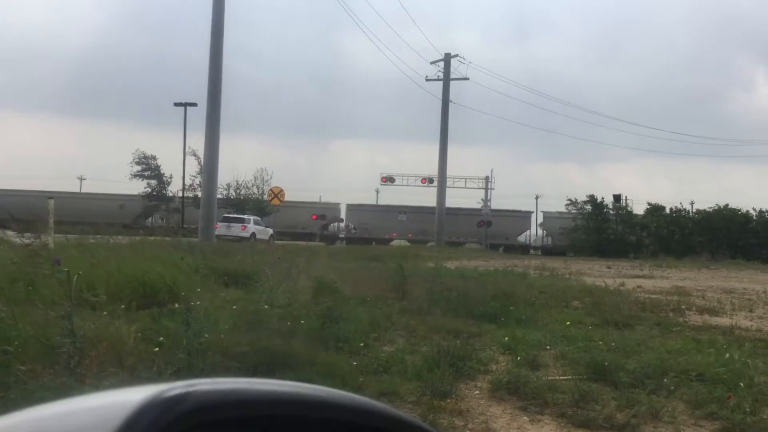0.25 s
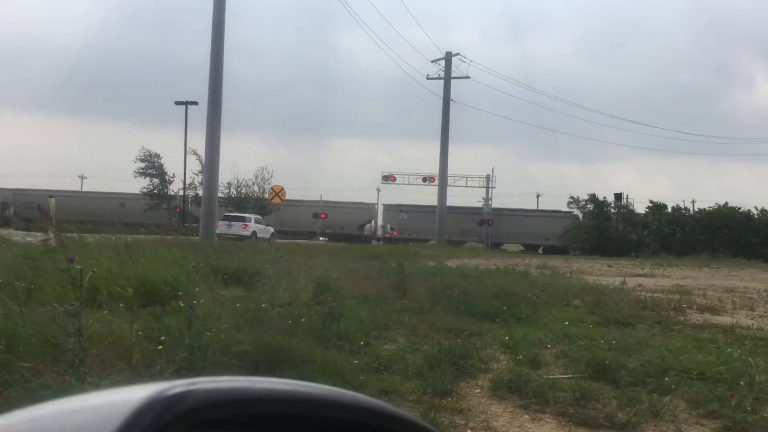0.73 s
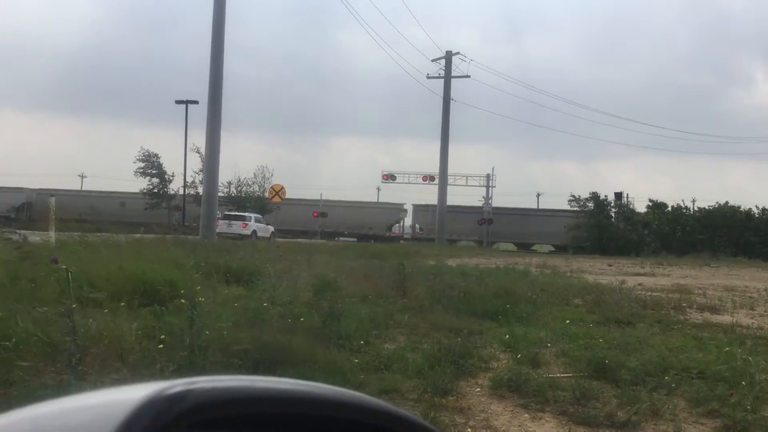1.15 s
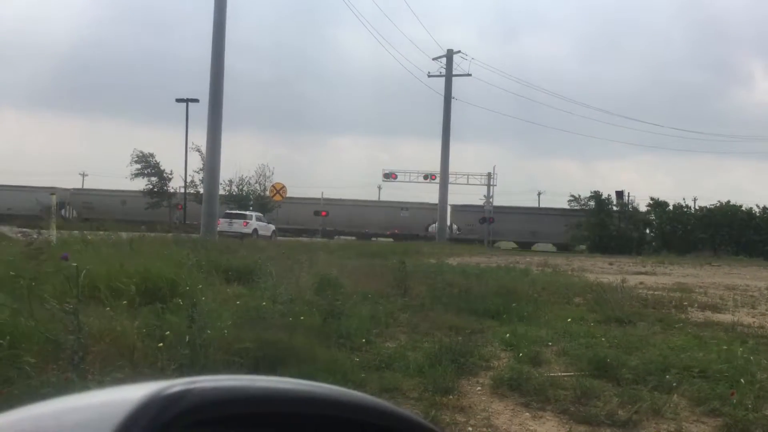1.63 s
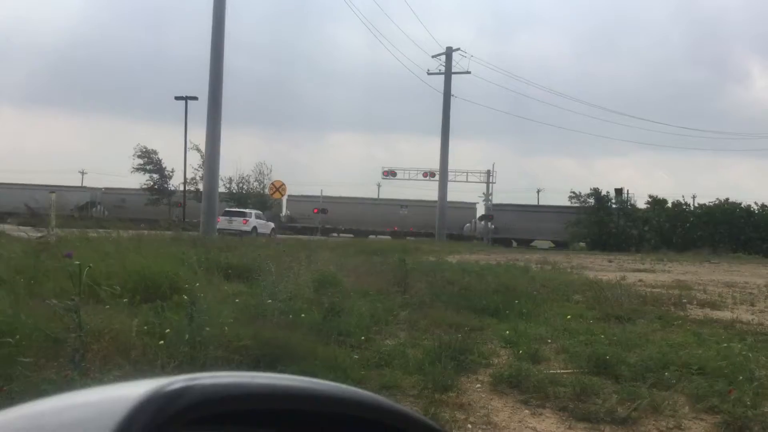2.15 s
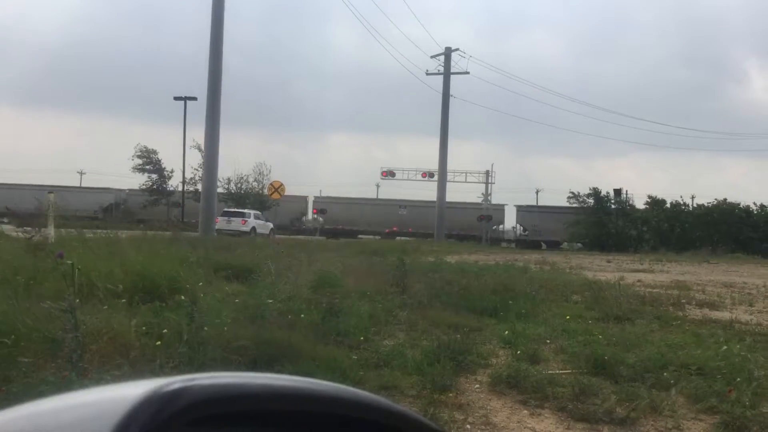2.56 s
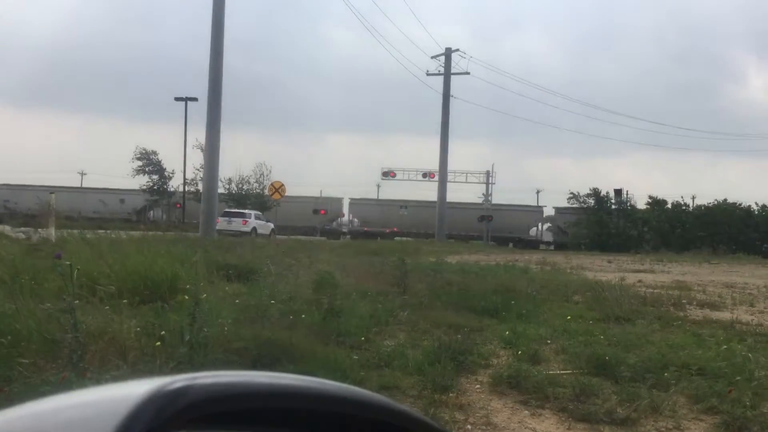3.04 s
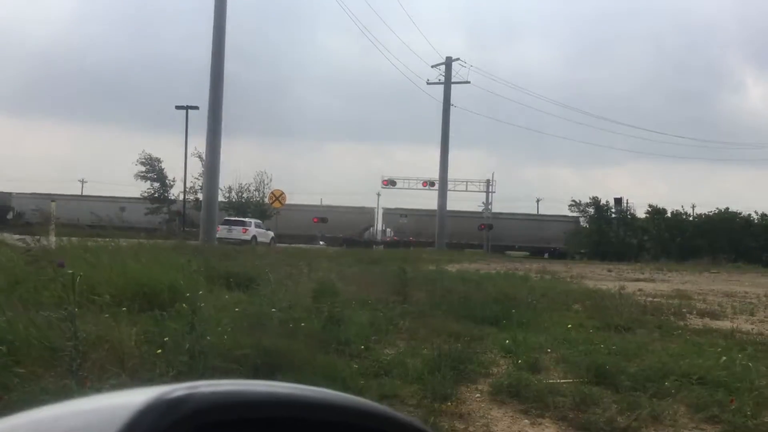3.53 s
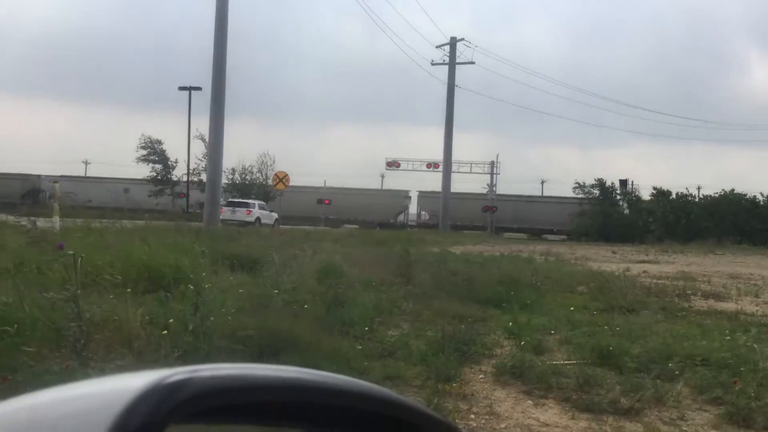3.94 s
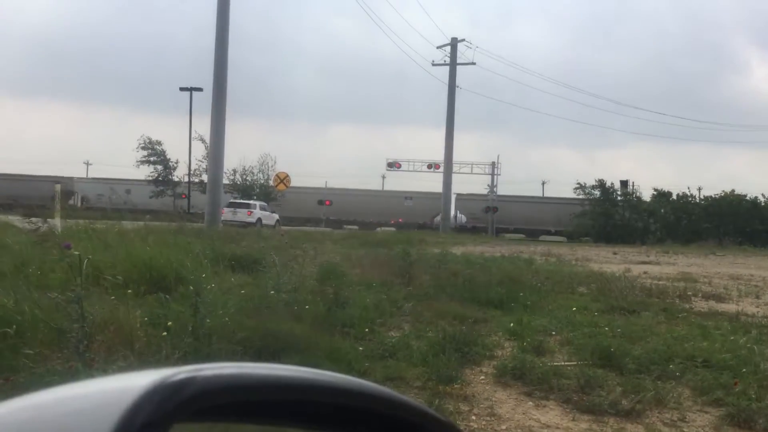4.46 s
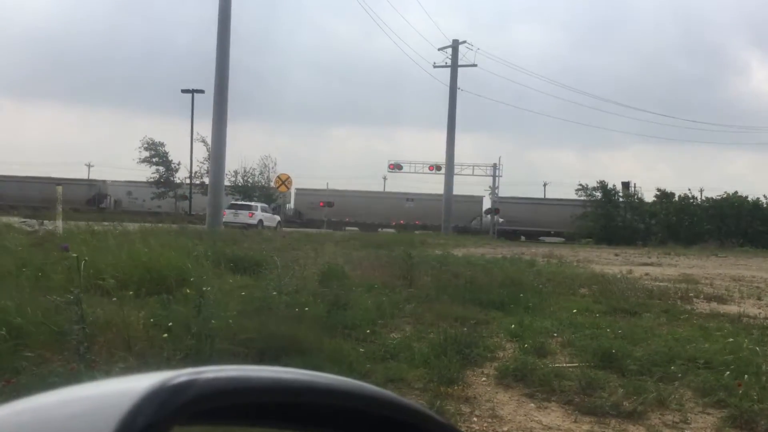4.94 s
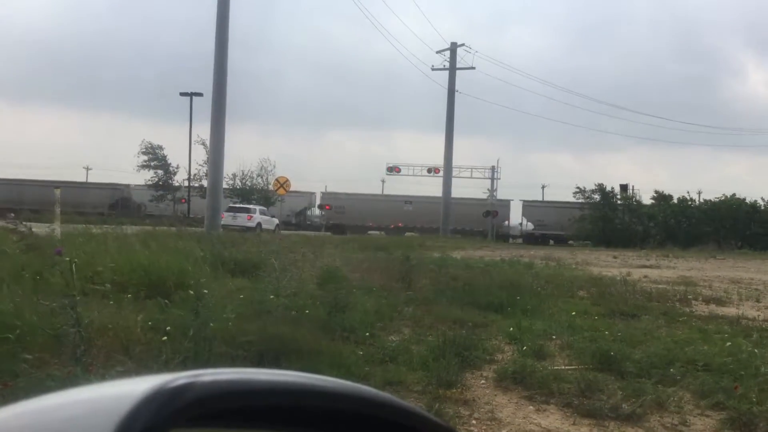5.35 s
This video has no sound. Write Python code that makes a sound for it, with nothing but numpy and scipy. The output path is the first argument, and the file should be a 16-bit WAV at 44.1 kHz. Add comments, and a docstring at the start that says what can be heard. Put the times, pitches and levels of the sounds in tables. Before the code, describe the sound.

Outdoors near a railway crossing, a phone microphone is hit by gusty wind: dense low thumps, flutter and crackly snaps for the first two seconds. The wind then eases to a low, uneven rumble, uncovering a freight train's rolling roar, paired wheel knocks and thin metallic squeals. Near the end the gusts return, with one very hard thump just before the cut.

```python
"""Gusty wind buffets and thumps a phone's microphone, while a freight train rolls past behind it.
The wind is shaped noise in four sizes of eddy, with single swings of the membrane for the strongest.
The train is patchy rolling noise that swells as wheels knock over rail joints; rubbing flanges hiss and
set wheel resonances squealing. One microphone port, with a drifting null, colours the train at first;
for a while the phone listens through its other port, which has a peak instead."""
import sys
import numpy as np
from scipy import signal
from scipy.fft import rfft, irfft, next_fast_len
from scipy.io import wavfile
from scipy.ndimage import uniform_filter1d, map_coordinates

SR = 44100
rng = np.random.default_rng(int(sys.argv[2]) if len(sys.argv) > 2 else 0)


def generate_wav(sig):
    """Save sig (samples, or channels by samples) to the path in sys.argv[1] as 16-bit PCM at SR."""
    pcm = np.round(np.clip(np.atleast_2d(sig).T, -1, 1) * 32767).astype(np.int16)
    wavfile.write(sys.argv[1], SR, pcm)


N = 246519

# strength of the wind at the microphone: [t/s, eddy level/dB, small-eddy level/dB]
WIND = [(0, -46.5, -65), (.1, -32.5, -38), (.3, -36, -36.5), (.5, -35, -36.5), (.75, -31, -32.5),
        (.95, -35, -42), (1.0, -41, -36.5), (1.2, -32, -32), (1.35, -29.5, -41), (1.55, -31.5, -44.5),
        (1.7, -30, -41), (2.05, -30, -51.5), (2.3, -37, -56), (2.6, -40.5, -56.5), (3.2, -41, -55),
        (3.5, -42, -55), (3.8, -38, -54.5), (4.15, -43, -57), (4.45, -42, -52.5), (4.78, -45, -54.5),
        (4.83, -48.5, -53), (4.88, -35.5, -48), (5.04, -42, -47.5), (5.25, -36, -39.5), (5.4, -35.5, -38.5),
        (5.59, -33.5, -38.5)]
# the strongest single eddies: [crest t/s, swing level/dB, pitch f/Hz, snap level re the swing/dB]
THUMPS = [(0.029, -18.5, 304, 0), (0.066, -20, 200, -10), (0.082, -11, 297, -15), (0.101, -14, 169, -20),
          (0.116, -18, 160, -20), (0.182, -15.5, 362, 4), (0.211, -20, 180, -15), (0.226, -16.5, 278, 5),
          (0.251, -13, 260, 3.5), (0.306, -12, 200, -29), (0.328, -22, 180, -24), (0.366, -16.5, 227, -28),
          (0.386, -17.5, 235, -10), (.42, -17.5, 297, -5), (.434, -6.5, 190, -3), (.508, -17, 460, -10),
          (.525, -12, 426, -27), (0.541, -6.5, 220, -27), (.604, -16, 353, 5), (0.649, -5, 250, -4),
          (0.673, -12, 257, 1.5), (0.728, -17, 315, 8), (.748, -15, 435, -10), (0.767, -16, 242, 1),
          (0.803, -16, 223, 7), (0.834, -29, 220, -15), (.885, -15, 408, 4.5), (.905, -7.5, 296, -0.5),
          (0.929, -13.5, 260, -6), (0.945, -24, 200, -18), (0.977, -5.5, 262, -20), (0.993, -8.5, 248, -2),
          (1.007, -13.5, 282, 3), (1.025, -15, 260, 3), (1.049, -12, 330, -5), (1.071, -20, 350, 0),
          (1.095, -8.5, 350, 0), (1.125, -14.5, 253, -2), (1.143, -14.5, 310, -9), (1.155, -15, 200, -16),
          (1.173, -9.5, 270, -21), (1.197, -16, 383, 3.5), (1.214, -11, 364, 1.5), (1.221, -18, 170, -10),
          (1.238, -13, 220, 3), (1.258, -8, 305, -5), (1.284, -21, 170, -20), (1.297, -9, 288, -16),
          (1.305, -9.5, 427, 1.5), (1.371, -18, 220, -24), (1.386, -8.5, 235, -1), (1.433, -8.5, 192, 0.5),
          (1.457, -15, 239, -3), (1.476, -26, 260, -6), (1.52, -6.5, 284, -3), (1.543, -21, 200, -15),
          (1.605, -16.5, 260, -12), (1.652, -12, 288, 2), (1.672, -15.5, 220, -16), (1.698, -10.5, 210, 0),
          (1.728, -8, 180, -11), (1.75, -8, 280, -5.5), (1.786, -13.5, 285, 3.5), (1.813, -11.5, 286, 2),
          (1.83, -8.5, 260, -8), (1.878, -16, 189, -25), (1.894, -15.5, 300, -9), (1.926, -10.5, 202, -4),
          (1.942, -17, 298, -6), (1.981, -14, 201, -30), (2.001, -21.5, 262, -9), (2.025, -13.5, 197, -5),
          (2.154, -29, 200, -15), (2.18, -17.5, 273, -14), (2.228, -26, 202, -12), (2.306, -22, 200, -10),
          (2.355, -21, 205, -3), (2.421, -19, 219, -35), (2.514, -27, 188, -18), (2.611, -21.5, 202, -18),
          (2.687, -26, 160, -25), (2.785, -17, 199, -10), (3.111, -22, 162, -23), (3.167, -25, 169, -18),
          (3.198, -28, 169, -23), (3.46, -26, 163, -28), (3.555, -20, 181, -29), (3.647, -25, 190, -1),
          (4.217, -21.5, 218, -16), (4.279, -21, 274, -11), (4.299, -27, 200, -20), (4.342, -16.5, 248, -9),
          (4.52, -23, 267, -19), (4.541, -16, 243, -12), (4.649, -26, 180, -15), (4.676, -21.5, 298, -5),
          (4.698, -38, 200, -18), (4.713, -36, 280, -17), (4.847, -15, 238, -18), (4.877, -16, 190, -13),
          (4.904, -23, 180, -13), (4.969, -26.5, 258, -20), (5.069, -22.5, 275, -32), (5.09, -16, 242, -12),
          (5.111, -11.5, 360, -0.5), (5.137, -14.5, 193, -2), (5.176, -16, 200, -10),
          (5.203, -8.5, 245, -0.5), (5.235, -19, 258, 7.5), (5.252, -12.5, 184, 1.5),
          (5.269, -18.5, 362, 6), (5.292, -21.5, 370, -15), (5.363, -19, 268, -2), (5.398, -21, 221, -15),
          (5.41, -26, 200, -22), (5.425, -18, 192, -21), (5.45, -19, 200, -11), (5.475, -12, 238, 1),
          (5.493, -1, 311, -6), (5.585, -10.5, 263, -15)]
# centre frequencies of the wheel resonances: [f/Hz]
WHEEL_HZ = (2488, 3815, 4620, 5323, 6080, 7835, 9100, 9534, 9860, 10950, 11550, 12950, 14300)


def amp(db):
    """Level to amplitude: 20 dB is a factor of ten."""
    return 10 ** (np.asarray(db) / 20)


def unit(x):
    """Normalisation to a root-mean-square amplitude of 1."""
    return x / np.sqrt(np.mean(x ** 2) + 1e-20)


def colour(points):
    """Spectral envelope: gain interpolated through (Hz, dB) points on a logarithmic frequency axis."""
    f, db = np.transpose(points)
    return lambda hz: amp(np.interp(np.log(hz + 1), np.log(f + 1), db))


def curves(rows):
    """Linear interpolation in time: one value per sample for each column after the time."""
    s, *cols = np.transpose(rows)
    return [np.interp(np.arange(N) / SR, s, c) for c in cols]


def wobble(rate):
    """Slow random modulation: a smooth curve through normal random knots, rate of them a second."""
    knots = rng.standard_normal(int(N * rate / SR) + 4)
    return map_coordinates(knots, [np.arange(N) * rate / SR])


def filtered(x, response):
    """Linear filtering: the spectrum of x times a response of frequency."""
    m = next_fast_len(N + 8192)
    return irfft(rfft(x, m) * response(np.fft.rfftfreq(m, 1 / SR)), m)[..., :N]


def bells(rows, width_s, rise=1):
    """Superposition of sech swells, one per (crest s, height), down to a third width_s after the crest."""
    t = np.arange(0, N + 64, 64) / SR
    s, height = np.transpose(rows)
    late = (t - s[:, None]) / np.reshape(width_s, (-1, 1))
    late = np.where(late < 0, late / rise, late)  # rise: time scale before the crest over that after it
    swells = height[:, None] / np.cosh(np.clip(1.76 * late, -50, 50))
    return np.interp(np.arange(N) / SR, t, swells.sum(axis=0))


def evened(x, share):
    """Envelope compression: narrow noise with a share of its own chance beating taken out."""
    envelope = np.abs(signal.hilbert(x, next_fast_len(N))[:N])
    return x / (envelope + 0.1 * x.std()) ** share


def stirring(s, db, rule):
    """Wake turbulence: each thump stirs the air around it, the more the stronger it is."""
    level_db, grows, width_s = rule
    swells = np.transpose([s, amp(level_db + grows * (db + 7.0))])
    return bells(swells, width_s, rise=0.73)  # builds faster than it settles


def buffeting():
    """Intermittent turbulence: lumps shared by all but the flurries, sharper for smaller eddies."""
    # spectral envelope of each size of eddy: [f/Hz, relative level/dB]
    slow_colour, eddy_colour, small_colour = [(15, -64.5), (28, -35), (45, -5), (80, 1.5), (120, -4),
                                              (170, -18), (260, -55.5), (400, -120)], [(40, -120), (70, -37.5), (120, 3), (200, 1),
                                                            (320, -7.5), (450, -20), (650, -49.5),
                                                            (1000, -120)], [(150, -120), (260, -12), (420, 0),
                                                                          (600, -1.5), (800, -10.5),
                                                                          (1100, -25), (1500, -31.5),
                                                                          (2200, -60), (3000, -120)]
    # flurries of small eddies: [crest t/s, level/dB, time scale/s]
    flurry_rows = [(0.036, -32, 0.0089), (.085, -29, .015), (.18, -27.5, 0.019), (.255, -27, 0.0067),
                   (.21, -34, 0.007), (.291, -27, 0.0083), (.38, -33, 0.013), (.427, -26, 0.0066),
                   (.47, -30.5, 0.016), (0.509, -28, 0.0088), (.566, -37.5, .005), (.605, -31, 0.0058),
                   (0.643, -24, 0.0033), (0.706, -27.5, .007), (0.752, -26, 0.0051), (.826, -32, 0.0063),
                   (0.861, -34.5, .01), (.92, -26, .015), (1.072, -30, .005), (1.145, -32, 0.0069),
                   (1.197, -30, .005), (1.344, -35, 0.0051), (1.59, -37, 0.0051), (1.672, -26, 0.0051),
                   (1.774, -28, 0.0051), (1.833, -25, 0.0043), (1.939, -27.5, 0.0057), (2.001, -36, 0.0047),
                   (2.065, -35, 0.024), (2.206, -36.5, 0.0068), (2.354, -37.5, .007), (3.046, -42, 0.0068),
                   (3.617, -46, .006), (3.83, -44, .006), (3.925, -46, 0.0072), (4.25, -45.5, 0.015),
                   (4.335, -39, 0.0066), (4.665, -39, 0.023), (4.885, -34, .012), (5.449, -38, 0.007)]
    # turbulence stirred by a thump: [level at a -7 dB drive/dB, growth/(dB per dB), time scale/s]
    eddy_stir, small_stir = (-31, 0.69, 0.022), (-30, 1, 0.012)

    eddy_db, small_db = curves(WIND)
    s, db, _, snap_db = np.transpose(THUMPS)
    slow_level = amp(-34.5 + 0.39 * (eddy_db - eddy_db.mean()))  # sways less than the wind
    eddy_level = amp(eddy_db) + stirring(s, db, eddy_stir)
    small_level = amp(small_db) + stirring(s, db + 0.76 * snap_db, small_stir)  # follows the snap
    flurry_level = bells([(at, amp(top)) for at, top, _ in flurry_rows], [w for *_, w in flurry_rows])

    # bounded modulation: the strongest eddies are the thumps
    lumps, flicks = np.tanh(wobble(40)), np.tanh(wobble(120))
    slow = filtered(amp(0.52 * lumps) * rng.standard_normal(N), colour(slow_colour))
    eddy = filtered(amp(5.3 * lumps + 1.3 * flicks) * rng.standard_normal(N), colour(eddy_colour))
    small = filtered(amp(2.5 * lumps + 6.9 * flicks) * rng.standard_normal(N), colour(small_colour))
    duller = lambda f: colour(small_colour)(1.13 * f)  # the same envelope shifted down
    flurry = filtered(amp(3.6 * flicks) * rng.standard_normal(N), duller)

    return (slow_level * unit(evened(slow, share=0.29))
            + eddy_level * unit(evened(eddy, share=0.25))
            + flurry_level * unit(evened(flurry, share=0.4))
            + small_level * unit(evened(small, share=0.11)))


def minor_thumps():
    """Random occurrence: rows like THUMPS at chance moments, stronger and higher in stronger wind."""
    count = 45
    s, scatter = rng.random(count) * N / SR, rng.standard_normal((count, 3))
    wind_db = np.interp(s, *np.transpose(WIND)[:2])
    db = wind_db + 13.5 + 2 * scatter[:, 0]
    hz = (185 + 17.5 * (wind_db - wind_db.mean())) * np.exp(0.14 * scatter[:, 1])
    snap_db = -9.5 + 5 * scatter[:, 2]
    return list(zip(s, db, hz, snap_db))


def thumps(turns=0.28, settles=1.71, sag=0.32, snap_hz=720, snap_s=0.00049, crisper_db=1.18):
    """Transient response: an eddy snaps the membrane, which swings out more slowly at a sinking pitch."""
    out, t = np.zeros(N + SR), np.arange(-SR // 20, SR // 20) / SR
    rows = list(THUMPS) + minor_thumps()
    chance = rng.standard_normal((len(rows), 2))
    phase = np.pi / 2 * np.sign(chance[:, 0]) + 0.43 * chance[:, 1]  # mostly one way and straight back
    for (s, db, hz, snap_db), start in zip(rows, phase):
        cycles = t * hz
        swell = np.exp(-(cycles / turns / np.where(t > 0, settles, 1)) ** 2 / 2)
        swing = swell * np.cos(2 * np.pi * (cycles - sag * cycles * np.tanh(cycles)) + start)
        # hard snaps are shorter and higher: crisp is 1 for a snap at -10 dB
        crisp = amp(crisper_db * np.clip(db + snap_db + 10, -10, 10))
        snap_swell = np.exp(-np.sqrt(2.65 + (t * crisp / snap_s) ** 2))
        snap = snap_swell * np.cos(2 * np.pi * snap_hz * crisp * t + start)
        out[round(s * SR):][:len(t)] += amp(db) * (swing + amp(snap_db) * snap)
    return out[SR // 20:][:N]


def surges(sigma_s=0.0075):
    """Slow forcing: each swell of the slowest eddies rocks the membrane under a Gaussian envelope."""
    # swells of the slowest eddies: [crest t/s, level/dB, pitch f/Hz]
    surge_rows = [(0.061, -25, 104), (0.095, -22, 94), (0.165, -28, 89), (0.23, -20, 96), (0.261, -26, 98),
                  (0.31, -25, 102), (0.332, -26, 100), (0.441, -28, 85), (0.47, -25, 75), (0.578, -23, 83),
                  (0.659, -15, 70), (0.68, -12, 67), (0.735, -19, 85), (0.781, -18.5, 82), (0.807, -28, 93),
                  (0.901, -32, 89), (0.988, -19, 106), (1.02, -21, 87), (1.139, -23, 86),
                  (1.224, -14.5, 103), (1.287, -22, 100), (1.311, -18, 87), (1.391, -20, 87),
                  (1.441, -13, 97), (1.501, -24, 83), (1.612, -22, 90), (1.676, -20, 97), (1.724, -20, 104),
                  (1.766, -21, 86), (1.832, -16.5, 87), (1.928, -23, 87), (1.983, -16.5, 91),
                  (2.03, -21, 90), (2.133, -26, 106), (2.168, -30, 104), (2.202, -28, 86), (2.255, -28, 94),
                  (2.323, -26, 98), (2.375, -24, 84), (2.573, -26, 90), (2.684, -26, 99), (2.706, -31, 97),
                  (2.74, -25.5, 87), (2.834, -18.5, 84), (2.869, -23, 73.5), (2.95, -24.5, 88),
                  (3.009, -20.5, 87), (3.073, -25.5, 77), (3.159, -33, 85), (3.19, -31, 74),
                  (3.223, -31, 83), (3.266, -23, 87), (3.401, -32, 81), (3.453, -20.5, 95),
                  (3.485, -21.5, 92), (3.572, -21.5, 87), (3.6, -29, 82), (3.648, -26, 87),
                  (3.742, -25, 86), (3.861, -19, 78), (4.02, -20.5, 84), (4.074, -21, 90),
                  (4.125, -23.5, 84), (4.197, -21, 89), (4.293, -27, 95.5), (4.406, -19, 90),
                  (4.447, -19.5, 82.4), (4.56, -19, 81), (4.619, -24, 84), (4.653, -28, 83),
                  (4.85, -33, 97), (4.911, -33, 101), (5.027, -35, 75), (5.123, -19, 77), (5.209, -17, 105),
                  (5.258, -21, 89), (5.284, -30, 92), (5.443, -29, 91), (5.492, -11.5, 84),
                  (5.522, -27, 84)]
    out, t = np.zeros(N + SR), np.arange(-SR // 20, SR // 20) / SR
    for (s, db, hz), turn in zip(surge_rows, rng.random(len(surge_rows))):
        swell = np.exp(-(t / sigma_s) ** 2 / 2)
        out[round(s * SR):][:len(t)] += amp(db) * swell * np.cos(2 * np.pi * (hz * t + turn))
    return out[SR // 20:][:N]


def wind(soft_hz=2600, vent_hz=38):
    """Membrane compliance: hard pushes saturate, a vent bypasses slow ones, and treble is rolled off."""
    push = buffeting() + surges() + thumps()
    push = push / (1 + np.abs(push / .8) ** 4) ** (1 / 4)
    treble_loss = lambda f: 1 / (1 + (f / soft_hz) ** 8)
    vent_loss = lambda f: f ** 2 / np.sqrt(f ** 4 + vent_hz ** 4)
    return filtered(push, lambda f: treble_loss(f) * vent_loss(f))


def patchy(depth_db):
    """Nonstationary noise: white noise with patches of random gain in time and frequency."""
    z = signal.stft(rng.standard_normal(N + 512), nperseg=512)[2]
    field = uniform_filter1d(rng.standard_normal(z.shape), size=6, axis=0)  # across frequency
    field = uniform_filter1d(field, size=10, axis=1)  # across time
    return unit(signal.istft(z * amp(depth_db * unit(field)), nperseg=512)[1][:N])


def mode(f, hz, width):
    """Simple resonance: response of one damped mode, 1 at its centre."""
    return 1j * f * width / (hz * hz - f * f + 1j * f * width)


def rolling_roar(knock_db, brighter_db, split_hz=4200):
    """Roughness excitation: rolling noise in two bands, whose body swells at each knock."""
    # level of the roar ahead of the port: [t/s, body level/dB, hiss level/dB]
    roar_rows = [(0, -49, -49), (.1, -48.5, -48.5), (.6, -48, -46), (.78, -50.5, -50), (1.3, -44.5, -49),
                 (1.45, -49.5, -51), (1.95, -52.5, -51.5), (2.4, -48.5, -52.5), (2.6, -51.5, -52.5),
                 (2.8, -49, -51.5), (3.05, -50, -47), (3.13, -47.5, -49), (3.2, -46, -44.5),
                 (3.55, -47, -49.5), (4.1, -45, -46), (4.5, -47, -50), (4.85, -45.5, -50),
                 (5.0, -49.5, -53.5), (5.3, -48.5, -51), (5.59, -48, -52.5)]
    body_db, top_db = curves(roar_rows)
    rolling = amp(1.04 * wobble(24.91)) * patchy(depth_db=1.4)
    low = lambda f: 1 / (1 + (f / split_hz) ** 12)
    hum = lambda f: 1 + amp(-1.5) * mode(f, WHEEL_HZ[0], 27)  # the lowest mode hums along
    body = filtered(rolling, lambda f: low(f) * hum(f))
    top = filtered(rolling, lambda f: 1 - low(f))
    duller_body = filtered(body, lambda f: 1 / (1 + (f / 2700) ** 4))
    knocks = (amp(knock_db) - 1) * duller_body
    return amp(body_db) * (body + knocks) + amp(top_db + brighter_db) * top


def flange_squeal(rub_db):
    """Frictional excitation: a light rub mostly hisses, a hard one slips and rings the wheel modes."""
    # spectral envelope of the rubbing hiss: [f/Hz, relative level/dB]
    rub_colour = [(1500, -69), (2500, -37.5), (5000, -37.5), (7000, -20.5), (9000, -10.5), (12000, 5),
                  (15200, -4.5)]
    # resonances in the order of WHEEL_HZ: [bandwidth f/Hz, relative level/dB]
    wheel_modes = [(25, 32.5), (40, 8), (40, 8.5), (44, 12.5), (30, 26), (30, 14), (150, 5), (30, 20),
                   (30, 10), (70, 11.5), (120, 5), (200, -0.5), (80, 2.5)]
    rub = filtered(patchy(depth_db=3.5), colour(rub_colour))
    ring = np.zeros(N)
    for hz, (width, db) in zip(WHEEL_HZ, wheel_modes):
        flutter = amp(db - 3.0 + 2.5 * wobble(9))  # each mode flutters on its own
        ring += flutter * filtered(rub, lambda f: mode(f, hz, width))
    grip_db = 0.64 * (rub_db + 29.0) + 1.5 * wobble(28)
    return amp(rub_db) * (rub + amp(grip_db) * ring)


def train(knock_s=0.029, rub_floor_db=-49):
    """Wheel-rail contact: rolling roar with knocks, plus flange friction that never quite stops."""
    # wheels knocking over rail joints: [crest t/s, rise of the roar's lower body/dB]
    knock_rows = [(.31, 1), (1.2, 1), (1.63, 3.5), (2.9, 5.5), (3.07, 5.5), (3.69, 3), (3.85, 3), (5.08, 7),
                  (5.25, 4.5)]
    # flanges rubbing the rail: [crest t/s, level/dB, fall time scale/s]
    rub_rows = [(.09, -44, 0.02), (.2, -54, .05), (.31, -35.5, 0.061), (.49, -50, .03), (.8, -60.5, 0.16),
                (1.2, -46, 0.044), (.93, -48, 0.043), (1.63, -41, 0.054), (2.31, -38.5, 0.063),
                (2.4, -37, 0.081), (2.6, -48, 0.088), (2.73, -44, 0.06), (3.0, -37, 0.045),
                (3.129, -54, 0.02), (3.43, -50, .025), (3.83, -68, 0.025), (4.32, -43, 0.02),
                (4.55, -39, 0.06), (4.62, -39, 0.046), (4.69, -30.5, 0.1), (4.78, -34, 0.12),
                (4.9, -41, 0.059), (5.215, -37.5, 0.065)]
    knock_db = bells(knock_rows, knock_s)
    rubs = bells([(s, amp(db)) for s, db, _ in rub_rows], [w for *_, w in rub_rows], rise=0.44)
    rub_db = 20 * np.log10(amp(rub_floor_db) + rubs)
    brighter_db = 0.47 * knock_db + 0.29 * (rub_db - rub_floor_db - 3.5)  # both brighten the roar
    return rolling_roar(knock_db, brighter_db) + flange_squeal(rub_db)


def notched_port(air, null_hz=3485, wander_hz=50, width_hz=410):
    """Interference null: the response changes sign at a frequency that drifts, with a wavering leak."""
    # the port's spectral envelope: [f/Hz, relative level/dB]
    notched_colour = [(250, -63.5), (500, -15), (1200, -7), (1900, -9.5), (2540, -3.5), (3050, -5.5),
                      (3320, -14.5), (3560, -12.5), (3780, -3), (4150, -14.5), (5400, -5), (7000, -22.5),
                      (9000, -33.5), (12000, -55), (15200, -63)]
    null = lambda hz: lambda f: colour(notched_colour)(f) * np.tanh((f - hz) / width_hz)
    lower, upper = (filtered(air, null(null_hz + side * wander_hz)) for side in (-1, 1))
    drift = (1 + np.tanh(wobble(4.4))) / 2  # crossfades the two nulls
    leak = amp(-33 + 5.6 * wobble(9.1)) * filtered(air, lambda f: mode(f, null_hz, 300) ** 2)
    return amp(15.5) * ((1 - drift) * lower + drift * upper + leak)


def peaked_port(air):
    """Port resonance: a fixed response with its strongest peak near 3.6 kHz."""
    # the port's spectral envelope: [f/Hz, relative level/dB]
    peaked_colour = [(250, -65), (500, -14), (1000, -13.5), (1400, -11), (2000, -12), (2450, -9),
                     (2800, -8), (3600, 1), (3950, -4.5), (4150, -16), (4350, -12.5), (4750, -12.5),
                     (5400, -22), (7000, -35.5), (9000, -46.5), (12000, -71.5), (15200, -71.5)]
    return amp(22.5) * filtered(air, colour(peaked_colour))


def scene():
    """Superposition: the wind on top of the train through whichever port is in use."""
    # the peaked port is in use between: [start t/s, end t/s]
    swap_times = (1.362, 3.113)
    t, air = np.arange(N) / SR, train()
    inside = np.minimum(t - swap_times[0], swap_times[1] - t)
    peaked = np.clip(inside / 0.005 + .5, 0, 1)  # 5 ms crossfade
    return ((1 - peaked) * notched_port(air) + peaked * peaked_port(air) + wind())[None]


def record(dry):
    """Band limitation: the phone keeps nothing from 15250 Hz up."""
    return filtered(dry, lambda hz: hz < 15250)


dry = scene()
out = record(dry)
generate_wav(out)
```